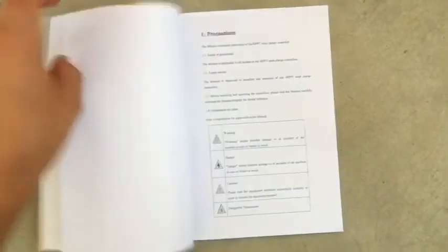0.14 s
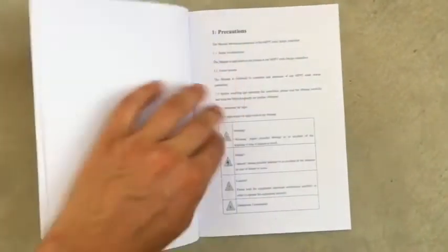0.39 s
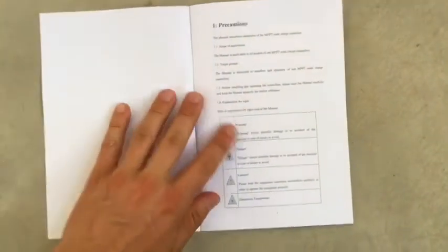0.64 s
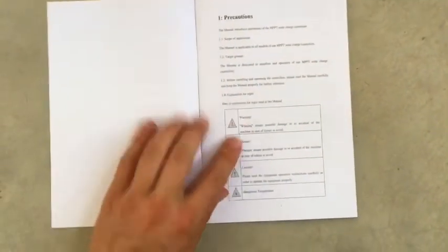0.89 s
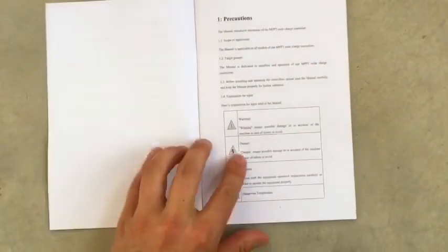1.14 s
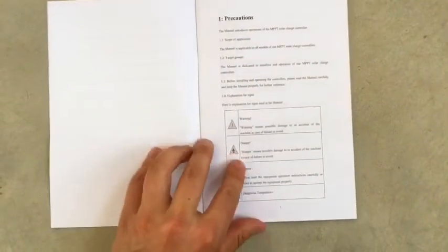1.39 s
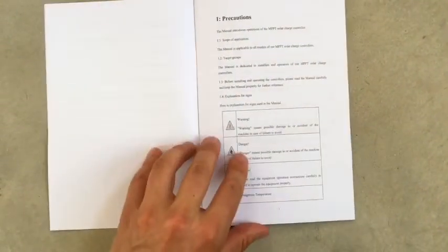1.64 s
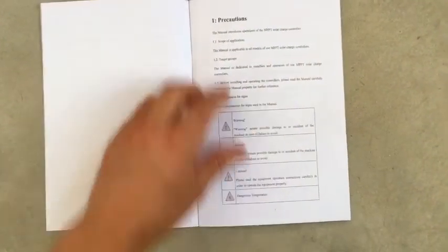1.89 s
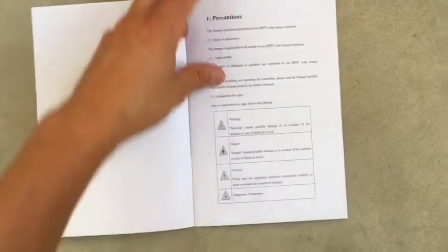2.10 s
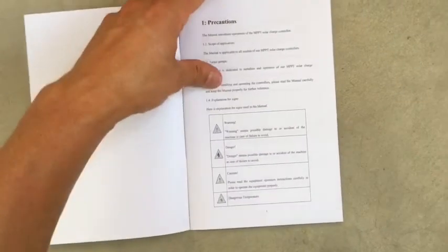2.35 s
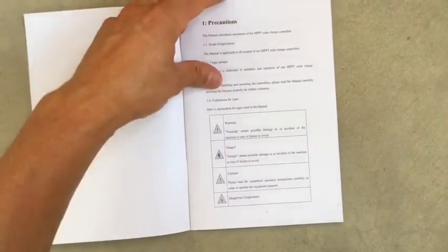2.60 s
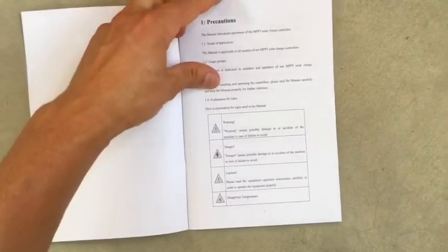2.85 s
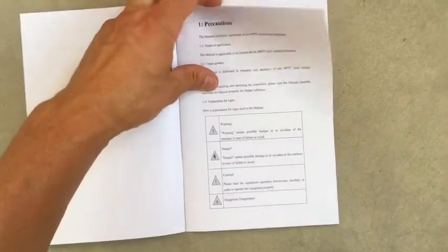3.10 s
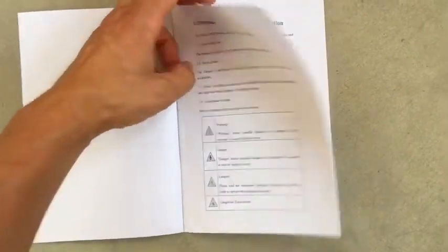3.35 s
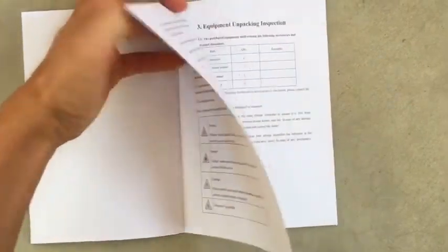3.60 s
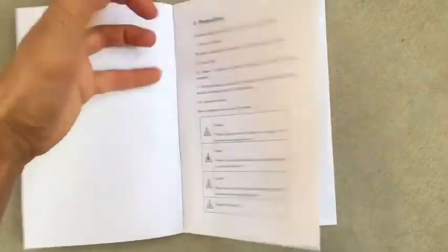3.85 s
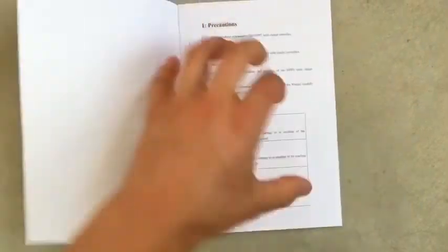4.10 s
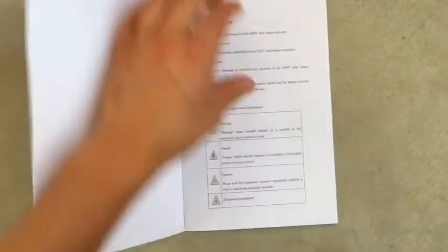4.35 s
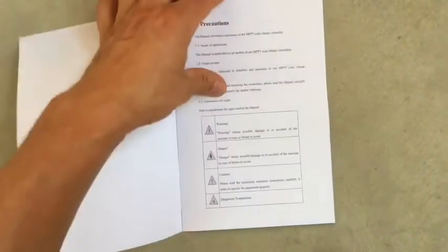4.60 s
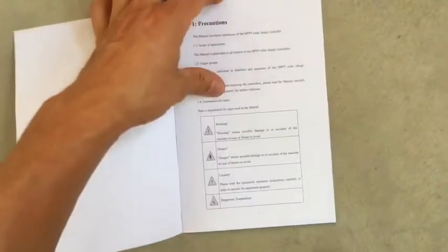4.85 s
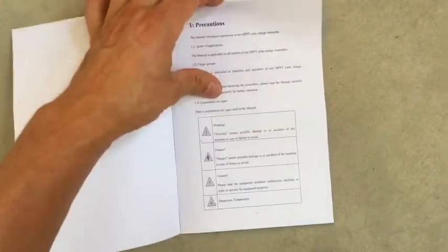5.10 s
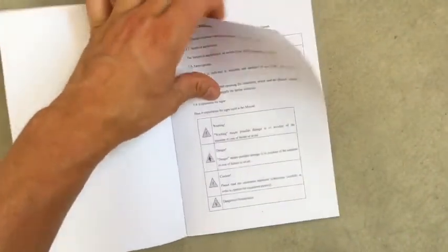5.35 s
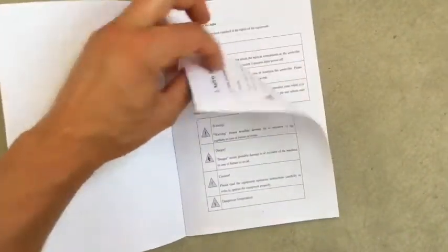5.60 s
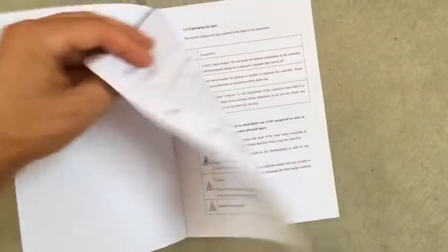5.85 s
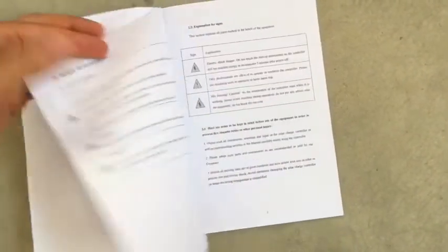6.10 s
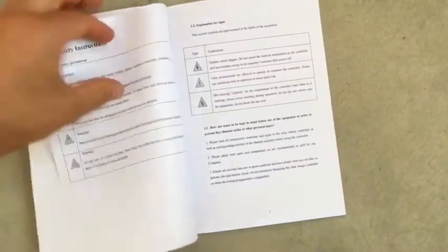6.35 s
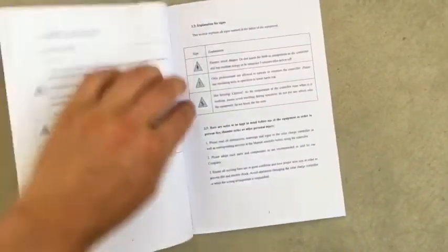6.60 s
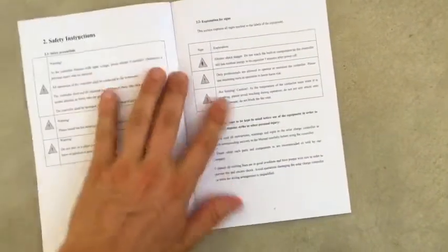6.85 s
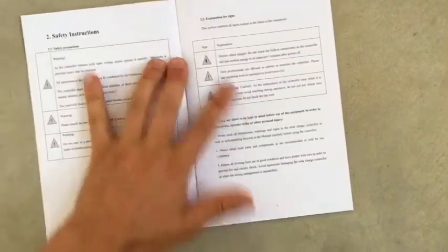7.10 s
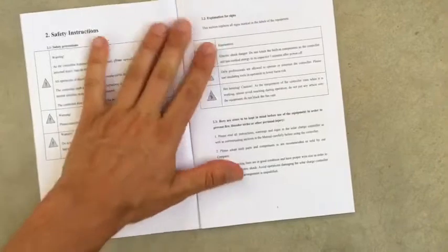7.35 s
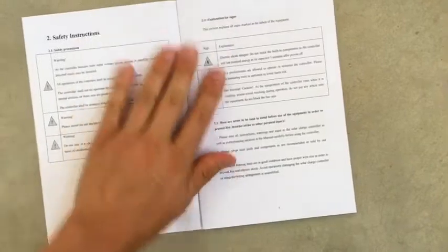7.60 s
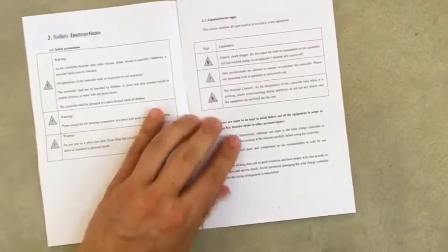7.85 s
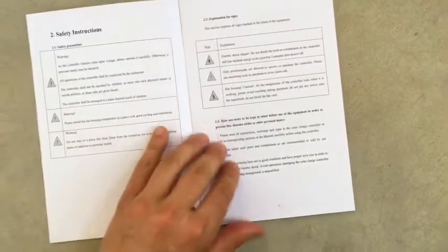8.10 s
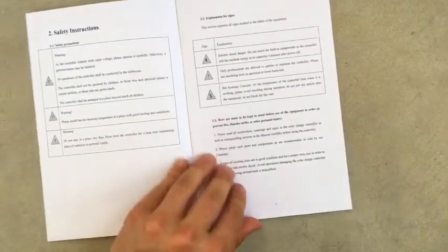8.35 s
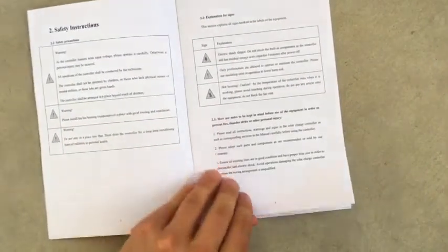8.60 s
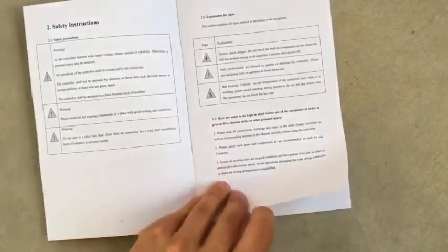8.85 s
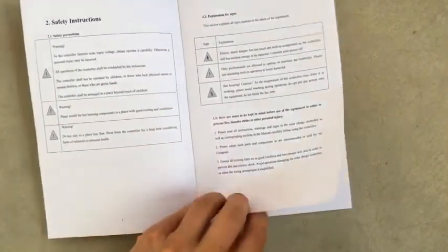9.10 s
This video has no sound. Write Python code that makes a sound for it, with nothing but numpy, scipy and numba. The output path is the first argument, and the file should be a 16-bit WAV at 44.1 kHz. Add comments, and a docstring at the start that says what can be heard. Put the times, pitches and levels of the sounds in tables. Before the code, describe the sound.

A hand turns thin booklet pages on a hard surface, heard close up in a small, dry room. A crisp flip opens, then lighter rubbing fades to near quiet. A page is lifted and dropped back, then a fuller turn crackles and thumps, followed by smoothing, sharp creases and a soft dragging palm. Faint low hum and hiss lie beneath.

```python
"""Paper rustle: a hand turns thin pages of a booklet on a hard surface and smooths them flat, close by.
Fingers and pages slide with a grainy noise hiss, and the bending sheet crackles round a moving resonance.
Creases snap as short rings with a crack on top; swinging pages puff dull noise and landings thump low.
A dragging palm whispers through a narrow band; a small room answers over a faint low hum and hiss."""
import sys
import numpy as np
from scipy import signal
from scipy.fft import rfft, irfft, next_fast_len
from scipy.io import wavfile
from scipy.ndimage import uniform_filter1d
from numba import njit

SR = 44100
rng = np.random.default_rng(int(sys.argv[2]) if len(sys.argv) > 2 else 0)


def wrap_up_sound(samples):
    """Save the sound to the file named by the first command line argument, as 16-bit audio."""
    columns = np.atleast_2d(samples).T
    # keep every value between -1 and 1, then stretch to whole-number steps
    tamed = np.clip(columns, -1, 1)
    steps = np.round(tamed * 32767).astype(np.int16)
    wavfile.write(sys.argv[1], SR, steps)


def ratio_of_db(decibels):
    """Turn decibels (scalar or array-like) into linear amplitude factors; 0 dB maps to 1."""
    return 10 ** (np.asarray(decibels, float) / 20)


N = 406161

# spectrum of the room's hum and hiss: frequency_hz, relative_level_db
ROOM_TONE_SPECTRUM = [(20, -47), (35, -5.5), (55, 0.5), (78, 2), (105, -2), (200, -11), (500, -16.5),
                      (1300, -17.5), (2500, -24.5), (6000, -28.5), (15800, -31.5)]
ROOM_TONE_DB = -67  # rms
ROOM_T60_S, ROOM_DB = 0.17, -14  # decay by 60 dB, strength of the echo

# air pushed by the swinging page and hand, joined over time: time_s, level_db
PAGE_SWINGS = [(0.0, -60), (0.49, -75.5), (2.25, -83), (5.26, -74.5), (5.49, -66), (7.85, -79),
               (9.21, -79.5)]
# spectrum of that air: frequency_hz, relative_level_db
PUFF_SPECTRUM = [(30, -8), (60, -4.5), (260, 4), (450, -1), (800, -46)]

# pages and palm landing: start_s, level_db, resonance_hz
LANDINGS = [(0.097, -56, 480), (0.298, -45, 397), (0.555, -55.5, 304), (2.883, -56, 284), (3.38, -57, 185),
            (3.442, -44, 393), (3.576, -58, 452), (3.816, -49.5, 392), (4.299, -51, 330), (4.32, -54, 130),
            (4.341, -50.5, 382), (5.218, -46.5, 312), (5.359, -49.5, 221), (5.37, -54, 80),
            (5.527, -47.5, 240), (5.57, -48, 380), (5.623, -43, 248), (5.635, -55, 120), (5.926, -48, 306),
            (6.208, -51, 500), (6.31, -51, 272), (6.36, -59, 330), (6.557, -44, 418), (6.842, -57, 444),
            (7.158, -49.5, 330), (7.58, -59, 133)]
THUMP_RISE_MS = 4.1  # from start to peak

# flat palm dragging down the page, joined over time: time_s, level_db, air_pocket_hz
PALM_STROKES = [(7.6, -90, 1700), (7.8, -67, 1600), (8.0, -61.5, 1610), (8.2, -69.5, 1460),
                (8.4, -64.5, 1310), (8.6, -67, 1160), (8.75, -58, 1090), (8.86, -71, 1090),
                (9.05, -59, 1140), (9.21, -66, 1100)]

# creases that buckle: peak_s, ring_db, ring_hz, crack_db, fade_ms (to 1/e)
CREASES = [(0.004, -23, 1480, -47, 2.6), (0.04, -29.5, 2270, -33, 1.75), (0.101, -35.5, 1500, -70, 11.6),
           (0.112, -28, 1100, -73, 5), (0.309, -22, 1450, -49, 3.16), (0.453, -42.5, 1390, -65, 2.7),
           (0.559, -22.5, 1180, -56, 1.1), (0.849, -39.5, 1420, -58, 2.3), (0.879, -32.5, 1700, -58, 1.3),
           (0.917, -31, 1740, -50, 2.9), (0.952, -21.5, 1490, -54.5, 1.03), (1.113, -45, 2450, -41.5, 1.25),
           (1.132, -54, 2630, -58, 2.9), (1.404, -52, 3030, -47.5, 2), (1.428, -29, 1490, -55, 0.96),
           (1.524, -49, 2830, -38, 1.2), (1.56, -57, 2970, -48, 1.2), (1.583, -42, 2380, -33.5, 0.92),
           (1.632, -36.5, 1060, -62, 3.7), (1.647, -52, 2630, -43, 2.2), (1.672, -30, 2160, -34, 0.78),
           (1.694, -29.5, 2250, -30.5, 0.75), (1.79, -38.5, 1400, -54, 0.74), (1.854, -42, 1250, -70, 3.1),
           (2.348, -55.5, 2320, -54.5, 1.5), (2.569, -56.5, 2390, -58, 2.1), (2.716, -45, 2510, -44.5, 2.2),
           (2.766, -54, 2000, -51, 2), (2.786, -56, 2180, -46, 1.4), (2.857, -55, 2040, -54, 3.9),
           (2.884, -39, 2650, -62, 3.2), (2.896, -27.5, 2220, -50, 1.54), (2.955, -45.5, 2180, -56, 3.4),
           (3.058, -41.5, 2000, -62, 1.5), (3.443, -25, 1130, -60, 8.2), (3.493, -35.5, 1050, -59, 1.5),
           (3.718, -39.5, 1250, -44, 6.1), (3.83, -39.5, 1030, -69, 8.2), (4.021, -53, 1420, -62, 6.9),
           (4.288, -48.5, 800, -53.5, 5), (4.305, -39.5, 1010, -61, 2.2), (4.357, -39, 925, -63, 7.3),
           (4.512, -53, 2380, -59, 3.4), (4.594, -32.5, 1310, -46, 1.15), (4.614, -41, 1270, -54, 2.2),
           (4.712, -54, 2060, -50.5, 2.5), (4.881, -47, 1290, -75, 2.6), (5.048, -45.5, 2260, -44, 1.4),
           (5.079, -53, 2690, -51, 2.7), (5.228, -31.5, 1000, -55, 1.7), (5.238, -24, 1480, -44, 1.45),
           (5.246, -21.5, 1320, -29, 1.82), (5.253, -29, 1530, -29.5, 1.25), (5.347, -37, 2350, -44, 4.3),
           (5.368, -40.5, 1520, -46, 5.1), (5.574, -36.5, 1720, -50, 5.8), (5.614, -28, 1600, -50, 3.7),
           (5.624, -24, 2600, -21.5, 4.85), (5.633, -31, 1790, -44, 1.88), (5.927, -29, 1640, -31, 3.2),
           (5.962, -32, 2330, -39, 4.6), (5.982, -29.5, 1410, -62, 6.1), (6.113, -28, 2240, -25, 0.79),
           (6.287, -31.5, 2530, -50, 3.2), (6.316, -25.5, 2090, -33.5, 2.65), (6.551, -38, 1680, -44, 5.8),
           (6.562, -21.5, 1700, -45, 1.84), (6.585, -30, 1910, -50, 4), (6.708, -44, 1490, -45, 2.8),
           (6.915, -60, 2250, -35.5, 0.77), (6.956, -33.5, 1310, -59, 1.5), (7.166, -36.5, 1380, -64, 3.2),
           (7.18, -34, 1530, -39, 1.6), (7.214, -18, 1920, -37, 2.9), (7.224, -38, 2250, -27.5, 1.46),
           (7.267, -34, 1940, -39, 2.8), (7.288, -30, 1770, -47, 1.1), (7.357, -33.5, 2060, -43, 0.65),
           (7.585, -10.5, 2000, -37, 0.56), (7.659, -31.5, 1400, -59, 2.14), (7.859, -46, 2030, -47, 1.6),
           (8.215, -44.5, 1030, -75, 3.54), (8.275, -52, 1140, -73, 3), (8.772, -48, 3230, -37.5, 4.4),
           (9.181, -27.5, 1820, -52, 1.96)]
SNAP_RISE_MS, RISE_PER_FADE = 0.4, 0.25  # a snap that fades slowly also builds slowly

# pushes of the fingers or folds of the page: peak_s, hiss_db, crackle_db, swell_ms, fade_ms
# (swell and fade times are for the 10 dB nearest the peak)
PAPER_MOVES = [(0.0, -40, -20.5, 10, 14.2), (0.042, -40.5, -46, 15, 38), (0.083, -44, -52, 38, 8),
               (0.11, -75, -39.5, 27, 58), (0.14, -47.5, -45, 10, 50), (0.215, -45.5, -46, 50, 90),
               (0.307, -41, -37.5, 16, 62), (0.46, -52, -57, 43, 86), (0.553, -45.5, -46, 40, 69),
               (0.71, -51, -59.5, 80, 42), (0.84, -48, -50.5, 90, 70), (0.895, -50, -40.5, 26, 38),
               (0.94, -43.5, -40.5, 51, 37), (1.05, -59.5, -60.5, 91, 76), (1.275, -59.5, -62.5, 60, 180),
               (1.434, -57, -56.5, 44, 40), (1.53, -54.5, -61, 20, 18), (1.588, -55.5, -56.5, 22, 29),
               (1.69, -57.5, -55.5, 60, 59), (1.795, -57.5, -57.5, 25, 32), (1.957, -55, -54.5, 200, 120),
               (2.08, -61, -64.5, 110, 96), (2.5, -76, -72, 220, 300), (2.725, -65.5, -68, 71, 20),
               (2.78, -70, -76, 22, 55), (2.89, -66, -42, 12, 11), (2.98, -57, -57, 135, 130),
               (3.19, -54.5, -57.5, 98, 320), (3.38, -44.5, -47.5, 45, 35), (3.425, -58, -48, 45, 80),
               (3.58, -52.5, -52, 300, 300), (3.715, -54, -53, 50, 13), (3.835, -66, -45.5, 23.5, 79),
               (3.933, -45, -41.5, 18, 23.6), (4.02, -72, -61.5, 21, 16), (4.298, -50.5, -49.5, 9, 41),
               (4.362, -64, -47, 23, 37), (4.45, -60, -51.5, 35, 24), (4.608, -53, -47, 40, 47),
               (4.708, -57.5, -54.5, 16, 39), (4.8, -63, -59, 30, 78), (4.917, -62, -58, 29, 25),
               (4.98, -69, -58, 25, 340), (5.14, -52.5, -57, 38, 39), (5.21, -44, -43.5, 16, 30),
               (5.245, -40.5, -41, 29, 23), (5.3, -51, -55.5, 43, 60), (5.362, -48, -39.5, 10, 18),
               (5.43, -50.5, -54.5, 72, 120), (5.576, -44, -50, 36, 26), (5.626, -43, -28.5, 14.5, 20.6),
               (5.7, -53, -52, 85, 55), (5.82, -46.5, -48, 84, 210), (5.93, -36, -38, 30, 26),
               (5.975, -66, -37.5, 31, 31), (6.095, -39, -37.5, 44, 30), (6.145, -60, -45.5, 28, 28),
               (6.213, -60, -45, 15, 21), (6.27, -42.5, -44, 85, 120), (6.378, -39.5, -42.5, 24, 51),
               (6.507, -44, -47.5, 25, 37), (6.572, -49, -30, 18, 24), (6.619, -44, -40.5, 57, 22),
               (6.71, -51.5, -50, 82, 91), (6.85, -48, -50, 110, 116), (7.082, -51, -60.5, 97, 150),
               (7.171, -49, -50.5, 32, 25), (7.219, -43, -39, 16, 16.6), (7.277, -44, -44, 23, 25),
               (7.35, -45.5, -53, 74, 43), (7.494, -43.5, -52.5, 39, 110), (7.59, -46, -45, 16, 36),
               (7.713, -48, -52.5, 160, 45), (7.85, -51, -61.5, 170, 120), (8.01, -58.5, -63.5, 85, 120),
               (8.31, -60, -63.5, 340, 120), (8.54, -57, -62, 106, 170), (8.667, -48.5, -59.5, 25, 90),
               (8.77, -50.5, -56, 63, 43), (8.82, -54.5, -62, 15, 20), (8.91, -52.5, -60, 35, 86),
               (9.04, -52, -51.5, 43, 53), (9.187, -52.5, -55, 91, 27)]
FLANK_POWER = 1.46  # 1 = pointed peak, 2 = rounded
RESTING_HISS_DB, RESTING_CRACKLE_DB = -78, -86  # the hand lying on the page

# how the sheet is held, joined over time: time_s, resonance_hz, hiss_tilt_db (per octave)
SHEET_SHAPE = [(0.0, 1460, -6), (0.33, 1710, 1), (0.38, 1150, -1.5), (0.79, 1700, 0), (1.17, 1510, -3),
               (1.9, 1530, -0.5), (1.95, 2120, -1.5), (2.38, 1440, -1), (2.97, 2050, -1), (3.28, 1560, -3),
               (3.37, 3100, -6.5), (3.43, 1100, -5), (4.08, 1360, 1), (4.38, 955, -0.5), (4.44, 1670, -7.5),
               (4.64, 1150, -1.5), (5.02, 1510, -3.5), (5.9, 1630, -2), (5.99, 1350, -7),
               (6.08, 1900, -4.5), (6.38, 1600, -1.5), (6.77, 1450, 0), (7.44, 2470, -1), (8.51, 1470, 0.5),
               (8.77, 1980, -5), (9.21, 1900, -6)]
# spectrum of sliding skin and paper: frequency_hz, relative_level_db
SLIDE_SPECTRUM = [(700, -28), (1500, -15), (2800, -5.5), (6000, -3.5), (10000, -4), (13000, -7),
                  (15800, -14)]

# treble dips of the microphone port: frequency_hz, gain_db
PORT_RESPONSE = [(4340, 0), (4960, -3), (5700, -0.5), (6800, -1), (7590, -4.5), (8900, -1), (9600, -2),
                 (10300, -5), (11500, -0.5)]
TOP_HZ = 15850  # upper edge of the sound


def level(x, db):
    """Scale to an rms level."""
    return x * ratio_of_db(db) / np.sqrt(np.mean(x ** 2))


def colour(x, points):
    """Shape by (Hz, dB) points joined on a log-frequency axis."""
    hz, db = np.transpose(points)
    size = next_fast_len(len(x))
    f = np.maximum(np.arange(size // 2 + 1) * SR / size, 1)
    gain = ratio_of_db(np.interp(np.log(f), np.log(hz), db))
    return irfft(rfft(x, size) * gain, size)[:len(x)]


@njit
def svf(x, hz, damping):
    """State-variable band-pass, gain 1 at a centre that may move; damping = width / centre."""
    y, b, l = np.empty(len(x)), 0., 0.  # output, band-pass and low-pass memories
    for i in range(len(x)):
        g = np.tan(np.pi * hz[i] / SR)
        v = (b + g * (x[i] - l)) / (1 + g * (g + damping))
        b, l, y[i] = 2 * v - b, l + 2 * g * v, damping * v
    return y


def band(x, hz, damping):
    """A steep band: the resonance applied twice."""
    hz = np.ones(len(x)) * hz
    return svf(svf(x, hz, damping), hz, damping)


def walk(rate):
    """Random levels drawn rate times a second and joined smoothly; rms 1."""
    spacing = int(SR / rate)
    draws = rng.standard_normal(N // spacing + 2)
    joined = np.interp(np.arange(N) / spacing, np.arange(len(draws)), draws)
    return level(uniform_filter1d(joined, spacing // 2), 0)


def slips(per_s, spread_db):
    """Tiny stick-slip releases at random moments: mostly small, a few large."""
    when, size, swing = rng.random(N), rng.exponential(size=N), rng.standard_normal(N)
    return (when < per_s / SR) * ratio_of_db(spread_db * np.minimum(size, 5)) * swing


def played(table):
    """Columns of a curve table, joined over time."""
    s, *columns = np.transpose(table)
    return [np.interp(np.arange(N) / SR, s, c) for c in columns]


def shimmer(x, tilt_db, depth_db, top_hz):
    """A bent sheet has many narrow modes; as its shape changes each one swells and fades on its own."""
    out = 0
    mode_hz = 450 * 2 ** np.arange(0, np.log2(top_hz / 450), 1 / 6)  # six per octave
    for k, hz in enumerate(mode_hz):
        db = depth_db * walk(25) + tilt_db * np.log2(hz / 7500.)
        mode = signal.lfilter(*signal.iirpeak(hz, 10, fs=SR), x)
        out = out + (-1) ** k * ratio_of_db(db) * mode  # neighbours in opposite polarity
    return out


def room_tone():
    """A low hum over smooth hiss: one shaped noise whose level wavers slowly."""
    tone = colour(rng.standard_normal(N), ROOM_TONE_SPECTRUM)
    return level(tone * ratio_of_db(0.86 * walk(2.78)), ROOM_TONE_DB)


def room(x):
    """The hard surface and walls return a short, duller wash: decaying noise after a 3 ms gap."""
    t = np.arange(SR // 2) / SR
    tail = rng.standard_normal(len(t)) * np.exp(-np.log(1000) * t / ROOM_T60_S) * (t > .003)
    tail = colour(tail, [(200, 9.0), (1500, -5.0), (5000, -6), (15000, -3.0)])
    tail = tail / np.sqrt(np.sum(tail ** 2))
    return ratio_of_db(ROOM_DB) * signal.fftconvolve(x, tail)[:N]


def flap(db):
    """The page and hand push air as they swing: dull puffs of shaped noise."""
    return level(colour(rng.standard_normal(N), PUFF_SPECTRUM), 0) * ratio_of_db(db)


def thumps():
    """A page or palm lands and squeezes out air: a short dull burst round one broad low resonance."""
    out, t = np.zeros(N + 4096), np.arange(4096) / SR
    u = t / (THUMP_RISE_MS / 1000)
    push = u * np.exp(1 - u)
    for s, db, hz in LANDINGS:
        burst = band(rng.standard_normal(len(t)) * push, hz, 1.0)
        burst *= np.sqrt(np.sum(push ** 2) / np.sum(burst ** 2))  # the energy of the push
        at = int(s * SR)
        out[at:at + len(t)] += ratio_of_db(db) * burst
    return out[:N]


def palm_drag(db, hz):
    """Fine friction under the palm sounds through the narrow resonance of the trapped air."""
    friction = rng.standard_normal(N) * ratio_of_db(1.8 * walk(40))
    return level(band(friction, hz, 0.36), 0) * ratio_of_db(db)


def snaps():
    """Each crease gives way in a quick run of jolts: a low ring from the sheet, a sharper crack on top."""
    out, t = np.zeros(N + 4096), np.arange(4096) / SR
    for s, ring_db, hz, crack_db, fade_ms in CREASES:
        jolts = rng.standard_normal((2, len(t)))
        rise, fade = (SNAP_RISE_MS + RISE_PER_FADE * fade_ms) / 1000, fade_ms / 1000
        peak = 3 * rise  # leaves room for the build-up
        push = np.exp(np.minimum((t - peak) / rise, (peak - t) / fade))
        ring = band(band(jolts[0] * push, hz, 1.1), hz, 2.36)
        crack = band(jolts[1] * push, 5960.0, 2.0)
        # each part carries the energy of the push
        ring, crack = (v * np.sqrt(np.sum(push ** 2) / np.sum(v ** 2)) for v in (ring, crack))
        at = int((s - peak) * SR)
        out[at:at + len(t)] += ratio_of_db(ring_db) * ring + ratio_of_db(crack_db) * crack
    return out[:N]


def rustles():
    """Levels of hiss and crackle over time: every rustle swells to its peak and fades; their powers add."""
    s, hiss_db, crackle_db, swell_ms, fade_ms = np.transpose(PAPER_MOVES)
    t = np.arange(0, N + 64, 64) / SR
    since_ms = 1000 * (t[:, None] - s)
    distance = np.where(since_ms < 0, -since_ms / swell_ms, since_ms / fade_ms)
    shape = ratio_of_db(-10 * distance ** FLANK_POWER) ** 2
    curves = []
    for db, rest_db in ((hiss_db, RESTING_HISS_DB), (crackle_db, RESTING_CRACKLE_DB)):
        power = shape @ ratio_of_db(db) ** 2 + ratio_of_db(rest_db) ** 2
        curves.append(np.interp(np.arange(N) / SR, t, 10 * np.log10(power)))
    return curves


def crackle(db, hz):
    """Small bends of the sheet come in clusters and ring a broad resonance with a weaker one on each side."""
    bends = slips(5000, 2.04) * ratio_of_db(1.5 * walk(200))
    middle = band(bends, hz, 0.88)
    upper = ratio_of_db(-11.0) * band(bends, 1.8 * hz, 0.38)
    lower = ratio_of_db(-3.5) * band(bends, 0.69 * hz, 1.0)
    sheet = band(middle + upper + lower, hz, 3.18)  # bending radiates little far from the resonance
    return level(shimmer(sheet, 0, 1.8, 8000), 0) * ratio_of_db(db)


def sliding(db, tilt_db):
    """Skin and paper fibres catch and let go: dense noise plus random slips; the pressure flutters."""
    grain = rng.standard_normal(N) + level(slips(900, 3.0), -7)
    hiss = level(colour(grain * ratio_of_db(1.5 * walk(120)), SLIDE_SPECTRUM), 0)
    return level(shimmer(hiss, tilt_db, 1.3, 17000), 0) * ratio_of_db(db)


def scene():
    """Paper close by, its echo and the room tone."""
    hiss_db, crackle_db = rustles()
    sheet_hz, tilt_db = played(SHEET_SHAPE)
    paper = sliding(hiss_db, tilt_db) + crackle(crackle_db, sheet_hz) + snaps()
    paper = paper + palm_drag(*played(PALM_STROKES)) + thumps() + flap(*played(PAGE_SWINGS))
    return (paper + room(paper) + room_tone())[None]


def top_cut(x):
    """Nothing passes above the cut-off."""
    return signal.sosfilt(signal.butter(12, 16820, fs=SR, output="sos"), x)


def record(dry):
    """The microphone port dips at a few treble bands and a steep low-pass cuts the top."""
    mix = colour(dry[0], PORT_RESPONSE)[None]
    low_pass = signal.ellip(10, .2, 45, TOP_HZ, fs=SR, output="sos")
    mix = signal.sosfilt(low_pass, mix)
    return top_cut(mix)


dry = scene()
out = record(dry)
wrap_up_sound(out)
```